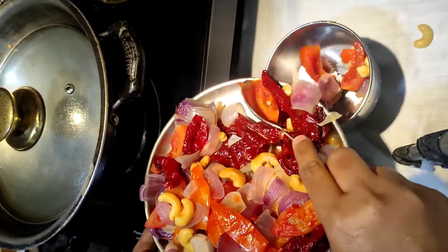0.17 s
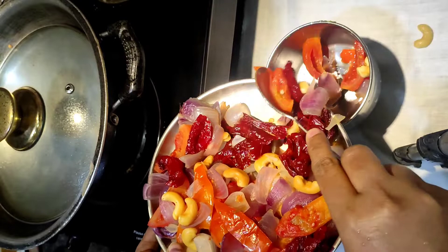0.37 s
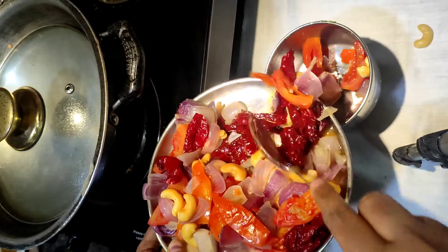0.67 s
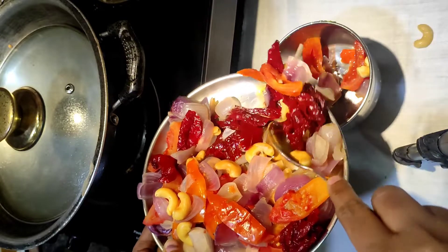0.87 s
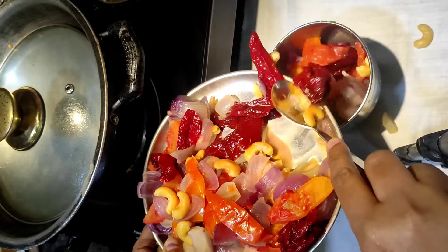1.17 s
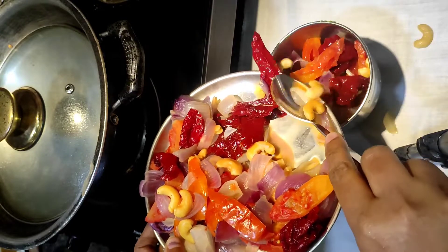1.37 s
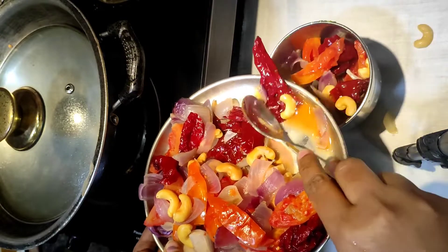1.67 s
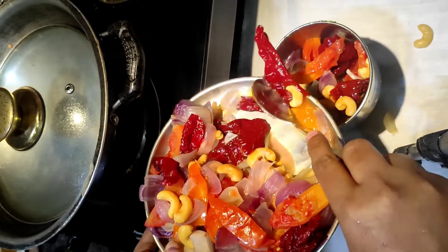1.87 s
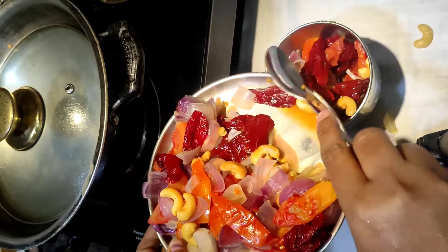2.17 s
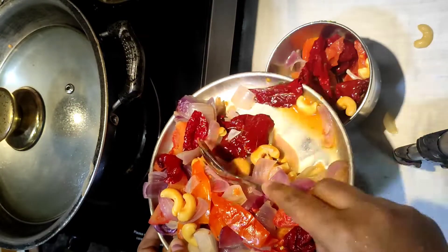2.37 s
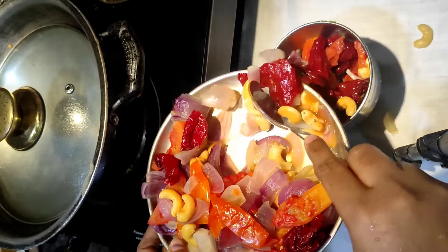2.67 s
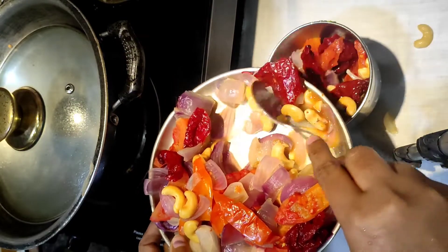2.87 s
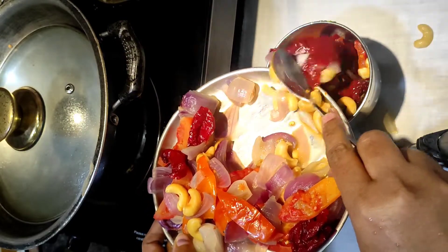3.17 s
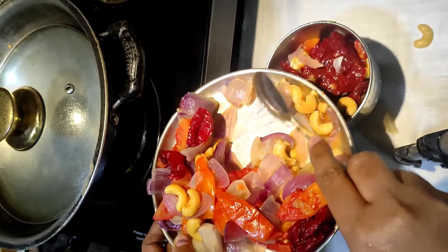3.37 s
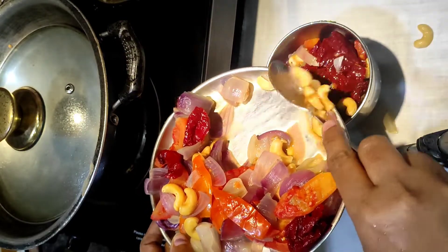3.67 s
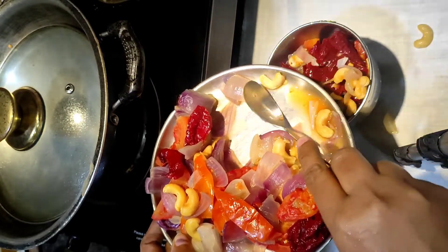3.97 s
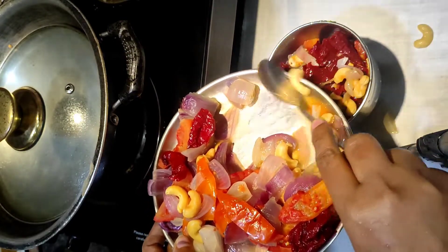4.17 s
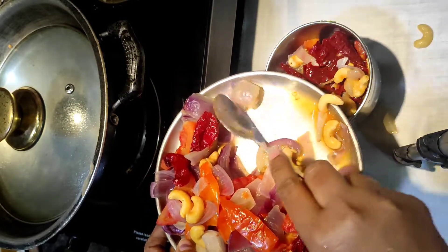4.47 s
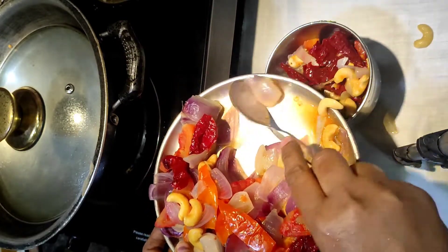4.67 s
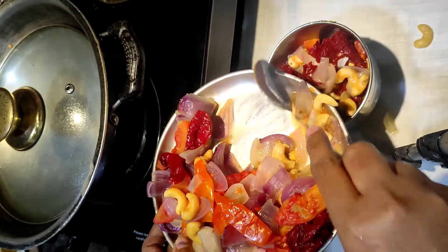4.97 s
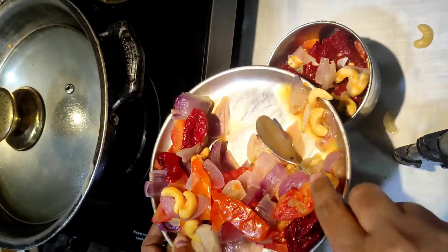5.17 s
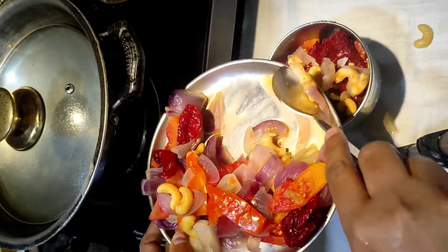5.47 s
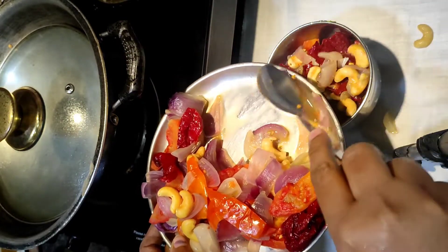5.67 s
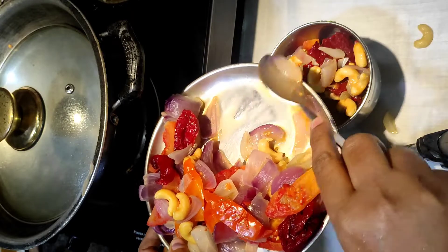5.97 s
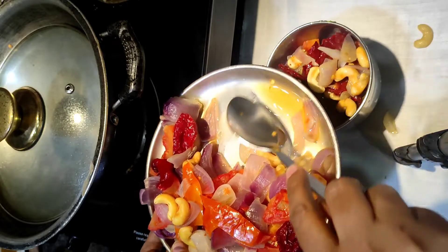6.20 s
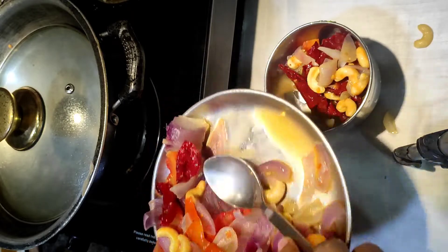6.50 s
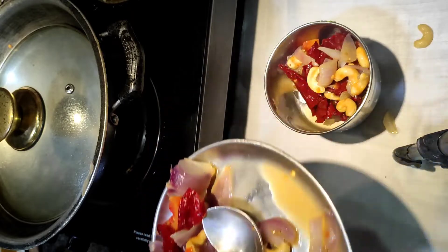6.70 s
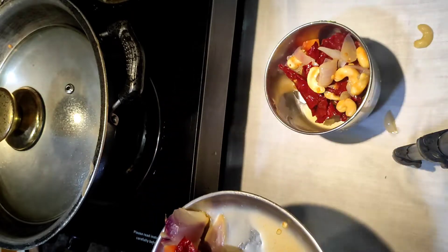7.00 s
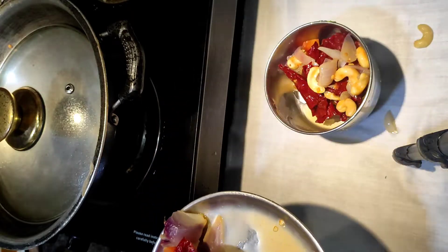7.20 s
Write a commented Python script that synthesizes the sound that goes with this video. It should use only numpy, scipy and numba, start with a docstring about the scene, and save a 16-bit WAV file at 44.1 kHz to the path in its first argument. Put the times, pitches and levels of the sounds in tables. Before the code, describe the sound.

A steady low motor hum with an airy fan rush fills a small hard-walled kitchen. Close to the microphone, a steel spoon clanks on a plate of food with a brief scrape, then makes only faint taps and rubs. Midway the knocks return, in a quick bright cluster with scrapes and a soft thud, then a few separate clanks and a final double knock before the hum continues alone.

```python
"""A steady hum and airy rush fill a kitchen; then a steel spoon knocks on and scrapes along a food-laden plate.
The hum is wavering sines, and the fan's rush is coloured noise with throbbing casing resonances.
Bursts of chatter (knocks) and uneven ticks (scrapes) ring the same damped plate modes over a grinder jar.
Soft thuds are swelling low sines, and hard walls add a short tail from eight cross-fed delay lines."""
import sys
import numpy as np
from scipy import signal
from scipy.fft import rfft, irfft, next_fast_len
from scipy.io import wavfile
from scipy.ndimage import uniform_filter1d
from numba import njit

SR = 44100
rng = np.random.default_rng(int(sys.argv[2]) if len(sys.argv) > 2 else 0)


def unload_audio(sound):
    """Save the sound as a 16-bit wav file, at the path given as the first command line argument."""
    columns = np.transpose(np.atleast_2d(sound))
    # keep every value between -1 and 1, then stretch to whole-number steps
    steps = np.round(np.clip(columns, -1, 1) * 32767)
    wavfile.write(sys.argv[1], SR, steps.astype(np.int16))


N = 323649  # length in samples

TOP_HZ = 14300  # upper edge of the sound
BULGE_WIDTH_HZ = 65  # bandwidth of a mode that rings freely under the spoon


def undb(db):
    """Decibels to gain."""
    return 10 ** (np.asarray(db) / 20)


def unit(x):
    """Scale to rms 1."""
    return x / np.sqrt(np.mean(x ** 2))


def across(table, hz):
    """Read an (Hz, value) table on a log-frequency axis."""
    f, v = np.transpose(table)
    return np.interp(np.log(np.maximum(hz, 1)), np.log(f), v)


def colour(x, table, share=1, lag_ms=0):
    """Filter by a share of an (Hz, dB) table and delay, even by a fraction of a sample."""
    size = next_fast_len(N)
    hz = np.fft.rfftfreq(size, 1 / SR)
    gain = undb(share * across(table, hz))
    delay = np.exp(-2j * np.pi * hz * lag_ms / 1000)
    return irfft(rfft(x, size) * gain * delay, size)[..., :N]


def panned(x, table, lag_ms=0):
    """Tilt left against right by an (Hz, left minus right dB) table; the left may arrive later."""
    left = colour(x[0], table, 0.5, lag_ms)
    right = colour(x[1], table, -0.5)
    return np.array([left, right])


def band(x, lo_hz, hi_hz):
    """Causal band-pass."""
    return signal.sosfilt(signal.butter(2, [lo_hz, hi_hz], "band", fs=SR, output="sos"), x)


def split(x, edges):
    """Neighbouring bands, every other one inverted so that they add up at their edges."""
    return [(-1) ** k * band(x, edges[k], edges[k + 1]) for k in range(len(edges) - 1)]


def ring(x, hz, width):
    """One damped mode with gain 1 at its centre; complex, so that its phase can be turned."""
    pole = np.exp((2j * hz - width) * np.pi / SR)
    return signal.lfilter([2 * np.pi * width / SR], [1, -pole], x)


def walk(rate):
    """Random levels held for 1 / rate seconds and smoothed twice; spread near 1."""
    k = int(SR / rate)
    steps = np.repeat(rng.standard_normal(N // k + 1), k)
    return 1.215 * uniform_filter1d(uniform_filter1d(steps, k), k)[:N]


def motors():
    """Compressor and fan tones: sines that waver in level and pitch, each with its own stereo phase."""
    # The steady partials of the motors.
    # Each row: pitch in Hz, level in dB rms, level waver in dB, left lead and equal right lag in radians.
    tones = [(97.4, -67, 4, 0.32), (127, -68.5, 6.5, 0.13), (157.3, -52.5, 0.5, -0.22),
             (190, -80, 5.5, -0.047), (220.7, -77, 4, 0.34), (269.3, -70, 2.5, -0.73),
             (315.8, -65, 2, 0.27), (335.7, -64, 1, 0.27), (437.3, -55, 3, -0.05), (463.8, -60.5, 2.5, .15),
             (482, -62.5, 0.5, 0.24), (532, -59, 0.9, -0.58), (580, -78, 2.5, 0.43), (732, -73, 1, 0.66),
             (1592, -74.5, 3, -.9), (2084, -70, 3, 0.56), (2277, -71, 4, .6), (2324, -67.5, 2.5, -0.6),
             (3439, -72, 4.5, -0.59), (5770, -78.5, 4, -1.03)]
    drift_hz = 0.92  # spread of the pitch drift, shared by all tones
    drift = np.cumsum(walk(6.017)) / SR
    waver = walk(14)
    out = np.zeros((2, N))
    for hz, db, waver_db, lead in tones:
        phase = 2 * np.pi * (hz * np.arange(N) / SR + drift_hz * drift + rng.uniform())
        own_waver = np.minimum(np.roll(waver, rng.integers(N)), 1.1)
        swell = np.sqrt(2) * undb(db + waver_db * own_waver)
        out += swell * np.sin(phase + lead * np.array([[1], [-1]]))
    return out


def fan():
    """Broad turbulent rush plus resonances of the casing; partly alike at the two microphones."""
    # Spectrum of the rush. Each row: frequency in Hz, relative level in dB.
    rush = [(12, -38), (20, -8.5), (102, -7), (154, -4.5), (209, -6), (325, -14.5), (383, -17), (452, -2),
            (647, -14.5), (1900, -24), (2300, -22), (3210, -28.5), (3480, -29.5), (9150, -35), (14600, -49)]
    # Casing resonances. Each row: centre in Hz, width of each of two passes in Hz, level in dB rms before the throb.
    casing = [(347, 106, -62.5), (457, 115, -61.5), (818, 82, -74), (1130, 73, -81), (2203, 570, -71.5),
              (4360, 120, -87.5), (7200, 88, -86.5), (9200, 280, -95.5)]
    # Likeness of the two channels. Each row: frequency in Hz, correlation from 0 to 1 (held to 0.98 at most).
    alike = [(30, 0.093), (150, 0.34), (400, 0.89), (700, 0.2), (1300, 0), (2300, .2), (4500, 0),
             (8000, 0.89), (13000, 1)]
    rush_db, rush_waver_db = -52.5, 0.5
    hiss_hz, hiss_flicker_db = 3480, 1.5  # above this the rush flickers on its own
    shaft_hz, throb_depth = 48.3, 0.27  # the compressor shakes the casing once a turn

    mid, side = rng.standard_normal((2, N))
    # the more side against mid, the less alike the channels are
    likeness = np.clip(alike, 0, [SR, 0.98])
    side = colour(side, [(hz, 10 * np.log10((1 - c) / (1 + c))) for hz, c in likeness])
    pair = np.array([mid + side, mid - side])

    out = undb(rush_db + rush_waver_db * walk(3.38)) * unit(colour(pair, rush))
    flicker = undb(hiss_flicker_db * walk(11))
    out += (flicker - 1) * band(out, hiss_hz, TOP_HZ)
    throb = 1 + throb_depth * np.cos(2 * np.pi * shaft_hz * np.arange(N) / SR)
    for hz, width, db in casing:
        resonance = ring(ring(pair, hz, width), hz, width).real
        out += throb * undb(db) * unit(resonance)
    return out


def thuds():
    """The plate bumps the jar: soft low sines that swell and fade."""
    # The bumps. Each row: start in seconds, pitch in Hz, envelope peak in dB, time to the peak in ms.
    bumps = [(4.038, 262, -40, 6), (4.235, 280, -45, 8.8), (5.874, 240, -44, 5.8), (6.035, 190, -45, 17)]
    out = np.zeros(N)
    t = np.arange(SR // 4) / SR
    for s, hz, db, ms in bumps:
        x = 1000 * t / ms
        swell = x * np.exp(1 - x)
        i = int(s * SR)
        out[i:i + len(t)] += undb(db) * swell * np.sin(2 * np.pi * hz * t)
    return out


def loaded(rings, detune):
    """Food and fingers detune the steel; modes under the spoon ring freely. Gives modes and which are free."""
    # Modes of the plate. Each row: nominal frequency in Hz, bandwidth in Hz, relative level in dB.
    steel = np.array([(470, 300, 1.5), (664, 47, -1), (920, 48, 5.5), (1120, 72, -10), (1365, 27, 4),
                      (1636, 130, 1.5), (1735, 80, -0.5), (2104, 100, 1), (2384, 176, 2), (2840, 36, -13),
                      (2947, 88, 6.5), (3334, 210, 0), (3910, 120, -1), (4080, 28, 4), (4490, 290, -3),
                      (4930, 61, -0.5), (5320, 100, -0.5), (6350, 48, 3), (6550, 120, 0), (7150, 166, 2.5),
                      (7490, 130, -11), (7850, 160, 0), (8340, 200, 2), (8810, 130, -0.5), (9510, 88, 1),
                      (9850, 53, -6), (10300, 61, -8), (11250, 90, -7), (10650, 97, -0.5), (11870, 49, -10),
                      (12100, 90, -3), (12400, 130, -3)], float)
    modes = steel.copy()
    modes[:, 0] *= 1 + detune * rng.standard_normal(len(modes))
    free = np.zeros(len(modes), bool)
    for hz in rings:
        nearest = np.argmin(np.abs(steel[:, 0] - hz))
        modes[nearest] = hz, BULGE_WIDTH_HZ, 0
        free[nearest] = True
    return modes, free


def plate(force, modes, gains, crack_db, turn):
    """A force rings every mode and radiates a bare crack; each mode has its own phase at the microphones."""
    counter_ms, counter_share = 1, 0.35
    # the crack also bounces off the counter, with opposite sign at the two microphones
    bounce = counter_share * np.roll(force, int(counter_ms * SR / 1000))
    out = undb(crack_db) * np.array([force + bounce, force - bounce])
    angles = rng.choice([-1, 1], len(modes)) * rng.uniform(0.68, 1, len(modes))
    for (hz, width, db), gain, angle in zip(modes, gains, angles):
        z = undb(db) * ring(gain * force, hz, width)
        # the phase gap narrows below 1100 Hz and above 6000 Hz
        lead = np.exp(0.5j * turn * angle * min(hz / 1100, 1, 6000 / hz))
        out += np.array([(z * lead).imag, (z / lead).imag])
    return out


def scrapes():
    """The rim slips over the steel in dense uneven ticks; as it travels, other modes take over."""
    # Spoon strokes over the plate. Each row: start in seconds, length in seconds, level of the middle band
    # at the start and at the end in dB rms, lows, highs and top in dB against the middle,
    # and the modes that ring freely in Hz.
    strokes = [(0.956, 0.053, -41.5, -45.5, -16, -5.5, -18, (2680, 3500, 5890, 7900)),
               (1.003, 0.051, -51, -51, -15, 1, -14, (5000, 5400)),
               (1.061, 0.021, -57, -58, 4.5, 1, -17, (1460, 3500, 5730)),
               (1.14, 0.028, -68, -71, 9.5, 1, -20, ()), (1.19, 0.066, -69, -71.5, 5, 7.5, -12, ()),
               (1.398, 0.043, -58, -50, -12.5, 1.5, -16, (7100,)),
               (1.954, 0.054, -62.5, -55.5, -5, -4, -21, ()), (2.06, 0.17, -65, -73.5, -20, 0.5, -25, ()),
               (2.67, 0.071, -76, -79, -7, 8, -14, ()),
               (3.55, 0.046, -43, -46, -6, -3.5, -17, (1760, 3800)),
               (4.05, 0.061, -42.5, -49.5, -1, -1.5, -17, (2080,)),
               (4.143, 0.025, -34.5, -54, -7, -7, -12, (926, 2090)),
               (4.183, 0.018, -46, -43, -3.5, -6, -8, (1600, 3030, 5000)),
               (4.209, 0.022, -38.5, -38.5, -8.5, 0.5, -15, (1610, 3070, 4150, 6230, 7130, 8400)),
               (4.593, 0.12, -50.5, -45, -17, -4, -16, (3050, 4050)),
               (4.74, 0.024, -34.5, -46.5, -13, -5.5, -11, (920, 2040, 4000, 6310)),
               (4.802, 0.031, -48.5, -43.5, -7, 0, -12, (4030, 5050, 5600)),
               (4.846, 0.021, -44.5, -48, -8, 1, -19, (1480, 2795, 7000, 9600)),
               (5.375, 0.13, -46, -58.5, -4, -1.5, -14, (900, 1900, 3700)),
               (5.538, 0.014, -52.5, -48, -6.5, 0.5, -16, (2900, 4080, 5080, 7380, 9700)),
               (5.886, 0.052, -39, -55.5, 2, -1.5, -24, (905, 1900)),
               (5.973, 0.016, -41, -41, -1, -5, -18, (2100, 3120)),
               (5.998, 0.013, -42, -42, -16, 1, -13, (930, 2110, 3200, 4270, 6570, 8500))]
    # Edges of lows, middle, highs and top, in one row of Hz.
    rub_edges = [600, 2300, 5500, 9500, 17000]
    touch_s = 0.012  # fade at both ends
    lift_s, lift_db_per_s = 0.23, 302  # fading as the hand eases off
    brighten_db_per_s = 6  # the lighter touch sounds thinner
    bulge_db, settle_db_per_s = 9, 150  # free modes are louder, damped again as the spoon lifts

    out = np.zeros((2, N))
    spikes = 1.9 * np.minimum(rng.exponential(size=N), 5)
    ticks = rng.standard_normal(N) * undb(spikes + 1.9 * walk(150) + 0.78 * walk(41))
    travel = walk(40)
    for s, length, start_db, end_db, lows_db, highs_db, top_db, rings in strokes:
        modes, free = loaded(rings, detune=0.028)
        shifts = rng.integers(N, size=len(modes))
        on = np.arange(int((s - touch_s) * SR), int((s + length + lift_s) * SR))
        lifting = np.maximum(on / SR - s - length, 0)
        db = np.interp(on / SR, [s, s + length], [start_db, end_db]) - lift_db_per_s * lifting
        bright_db = brighten_db_per_s * lifting
        bulge = np.maximum(bulge_db - settle_db_per_s * lifting, 0)
        gains = [undb(4.0 * np.minimum(travel[(on + shift) % N], 1.2) + is_free * bulge)
                 for is_free, shift in zip(free, shifts)]
        sound = plate(ticks[(on + shifts[0]) % N], modes, gains, crack_db=-7.5, turn=2.0)
        touch = np.minimum(np.minimum(on - on[0], on[-1] - on) / SR / touch_s, 1) ** 2
        tilts = lows_db, 0, highs_db + bright_db, top_db + bright_db
        for part, tilt_db in zip(split(sound, rub_edges), tilts):
            # the hand's pressure sets the loudness, whichever modes carry it
            even = part / np.sqrt(uniform_filter1d(part.mean(axis=0) ** 2, size=2000))
            out[:, on] += touch * undb(db + tilt_db) * even
    return out


def knocks():
    """Each knock is a first blow and a few ms of fading chatter; place and load decide which modes answer."""
    # Spoon knocks. Each row: start in seconds, peak of the middle band in dB, lows, highs and top in dB
    # against the middle, rise in ms, chatter decay in ms, left minus right in dB, and the modes that ring freely in Hz.
    blows = [(0.9475, -21.5, -9.5, -8, -17, 0.45, 8, -2, (700, 1367, 2030, 2400, 2680, 2980, 3680, 5000, 8500)),
             (1.0578, -43.5, 3, -12, -25, 1.8, 5, 0, (1180,)),
             (1.189, -47.5, 1, -20, -28, 2, 8, -3, (1800, 2775)),
             (1.2425, -50, 0, -8, -15, 2, 7.3, -4, (1300, 3100)),
             (1.4572, -41, -17, -20, -30, 3.02, 10, 3, (2900,)),
             (1.949, -42.5, -16, -2.5, -18, 0.52, 7, 2, (2260, 3960, 6000, 8100)),
             (2.6166, -53, 8, -8, -20, 0.27, 6.5, 1, (610, 3000)),
             (2.652, -50, -20, 4, -5, 0.28, 4, 0, (1600, 8200)),
             (3.5317, -25.5, 1.5, -3, -14, 1.16, 9.2, 2, (400, 1760, 2385, 3280)),
             (3.5982, -31, -16, -2.5, -15, 0.78, 9.4, 0, (1900, 4200)),
             (4.038, -18.5, 0, -3, -15, 0.44, 4.5, -1, (670, 1640, 2430, 2714, 2990, 3280, 6380)),
             (4.047, -21, -5, -16, -26, 0.46, 5, 1, (1300, 1700, 3280)),
             (4.1159, -16.5, -9.5, 0.5, -14, 3.5, 7.8, -1, (926, 1660, 2090, 2800, 3800, 4990, 5990, 7270, 9500, 10900)),
             (4.585, -32, -7.5, -6, -17, 0.48, 7, 0.5, (960, 1900, 3100)),
             (4.7261, -18.5, -12, -1.5, -27, 0.9, 8, 1, (2030, 2856, 3385, 4090, 6309, 6940, 8600)),
             (5.367, -22.5, -4.5, -12, -14.5, 0.77, 8.8, 1, (680, 1390, 1737, 2020, 3390)),
             (5.8732, -19.5, -2, -1, -10, 0.95, 5.5, -3, (650, 902, 1666, 2030, 2440, 2960, 4000, 6700)),
             (5.8844, -29.5, -1.5, -14, -28, 0.71, 5.9, -2, (970, 1800, 2440)),
             (5.9615, -20.5, -8, -6, -8, 1.5, 5.7, 1.5, (875, 1345, 1660, 2083, 2776, 3768, 9585))]
    # Edges of lows, middle, highs and top, in one row of Hz.
    knock_edges = [300, 1500, 4500, 9000, 17000]
    first_blow_db = 18  # first blow over the chatter
    bulge_db = 11.5  # modes that bulge under the spoon are louder

    out, size = np.zeros((2, N)), SR // 8
    t_ms = 1000 * np.arange(size) / SR
    for s, db, lows_db, highs_db, top_db, rise_ms, chatter_ms, pan_db, rings in blows:
        noise, grain = rng.standard_normal((2, size))
        force = noise * undb(4.2 * grain) * np.exp(-t_ms / chatter_ms) * np.minimum(t_ms / rise_ms, 1)
        force[int(rise_ms * SR / 1000)] += undb(first_blow_db)

        modes, free = loaded(rings, detune=0.012)
        answer_db = 2.9 * np.minimum(rng.standard_normal(len(modes)), 0.6)
        gains = undb(np.where(free, bulge_db, answer_db))
        # a free mode swings fully, however the chatter falls
        swing = np.array([np.abs(ring(force, hz, BULGE_WIDTH_HZ)).max() for hz in modes[free, 0]])
        gains[free] *= swing.mean() / swing
        gains *= rng.choice([-1, 1], len(modes))  # the blow lands on either side of each node line
        sound = plate(force, modes, gains, crack_db=-9.0, turn=1.28)

        i = int(s * SR)
        pan = np.array([[pan_db], [-pan_db]]) / 2
        # a broad soft contact favours the lows, a sharp edge the highs
        for part, tilt_db in zip(split(sound, knock_edges), (lows_db, 0, highs_db, top_db)):
            peak = np.abs(part.mean(axis=0)).max()
            out[:, i:i + size] += part / peak * undb(db + tilt_db + pan)
    return out


@njit
def walls(x, lags, gain, damp):
    """Echoes between hard walls: eight delay lines that feed each other, duller on every round."""
    line, soft, out = np.zeros((8, 4096)), np.zeros(8), np.zeros((2, len(x)))
    for i in range(len(x)):
        total = 0.
        for k in range(8):
            echo = gain[k] * line[k, (i - lags[k]) & 4095]
            soft[k] += (1 - damp) * (echo - soft[k])
            total += soft[k]
            out[k % 2, i] += soft[k]
        for k in range(8):
            line[k, i & 4095] = x[i] + soft[k] - total / 4
    return out


def scene():
    """The steady hum and rush, with the spoon on the plate and its echo off the walls."""
    # Balance of the hum and rush. Each row: frequency in Hz, left minus right in dB.
    air_pan = [(60, -1), (110, 5), (200, 0), (370, -1.0), (680, -0.5), (1250, 0), (2290, -0.5),
               (4210, -1.5), (7720, -0.5), (14200, 2)]
    # Balance of the spoon and its echo. Each row: frequency in Hz, left minus right in dB.
    plate_pan = [(60, 0), (110, 6), (200, 7), (370, -5), (680, 0), (1250, 0.5), (2290, 0.5), (4210, -4),
                 (7720, 0.5), (14200, 1.5)]
    room_t60_s, room_damp, room_db = 0.29, 0.058, -11  # decay time of the lows, dulling 0-1, level

    hum = motors() + fan()
    spoon = knocks() + scrapes() + thuds()
    lags = rng.integers(500, 2200, 8)  # samples
    echo_gain = undb(-60 * lags / SR / room_t60_s)
    # the tiny offset keeps the silent delay lines fast to compute
    tail = walls(spoon.mean(axis=0) + 1e-18, lags, echo_gain, room_damp)
    return panned(spoon + undb(room_db) * tail, plate_pan, lag_ms=0.015) + panned(hum, air_pan)


def record(dry):
    """The phone cuts the top: a steep low-pass."""
    return signal.sosfilt(signal.ellip(10, 0.2, 75, TOP_HZ, fs=SR, output="sos"), dry)


dry = scene()
out = record(dry)
unload_audio(out)
```